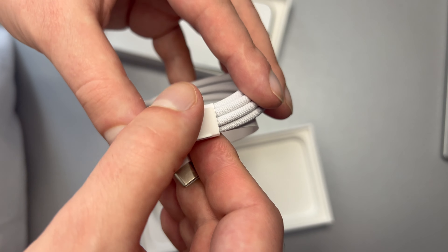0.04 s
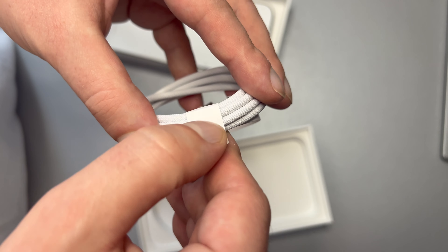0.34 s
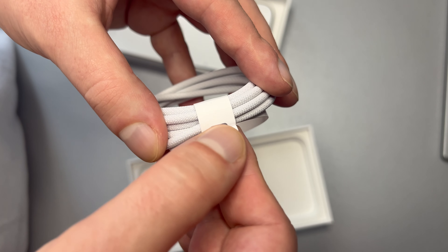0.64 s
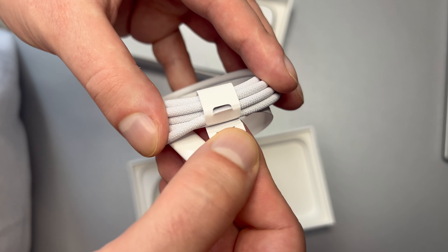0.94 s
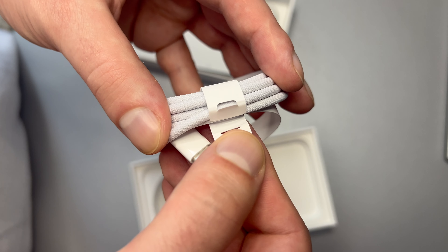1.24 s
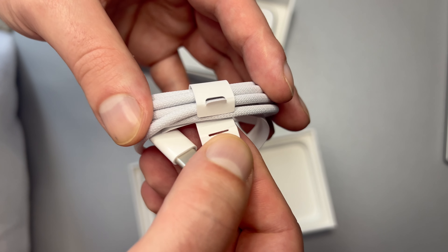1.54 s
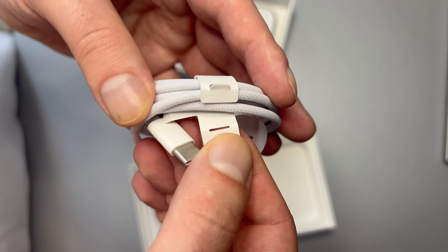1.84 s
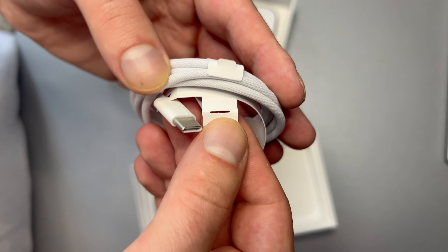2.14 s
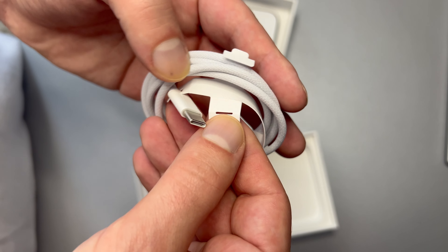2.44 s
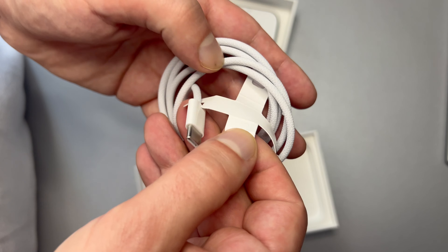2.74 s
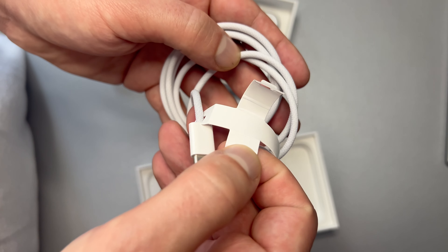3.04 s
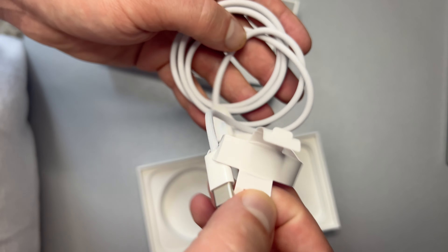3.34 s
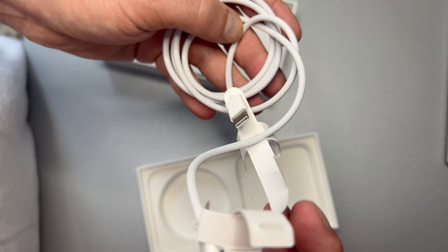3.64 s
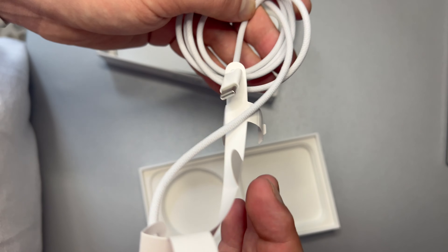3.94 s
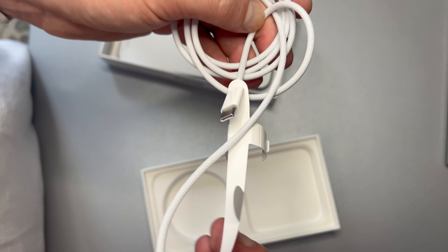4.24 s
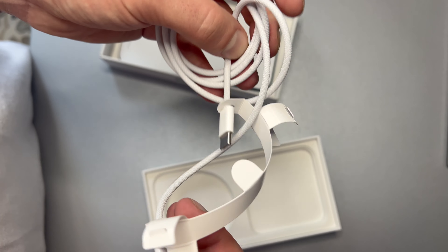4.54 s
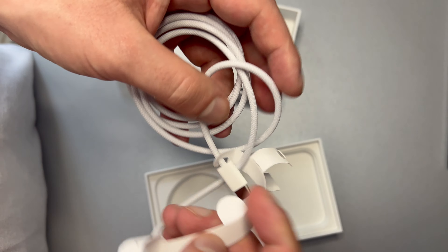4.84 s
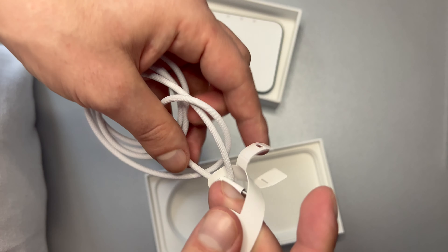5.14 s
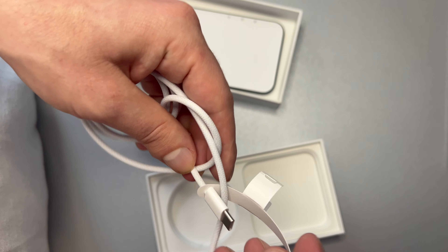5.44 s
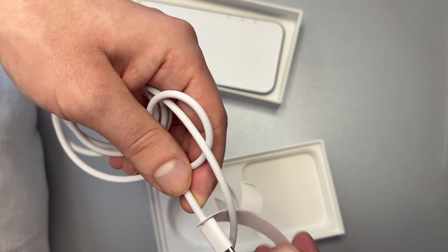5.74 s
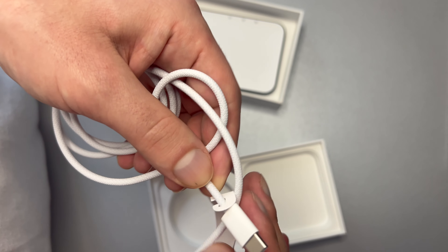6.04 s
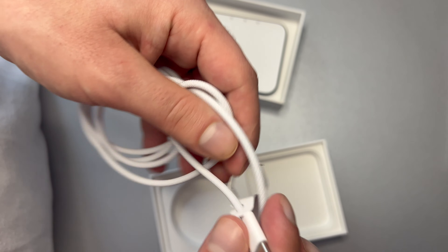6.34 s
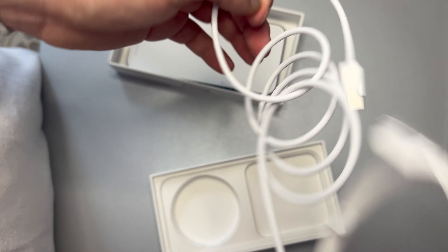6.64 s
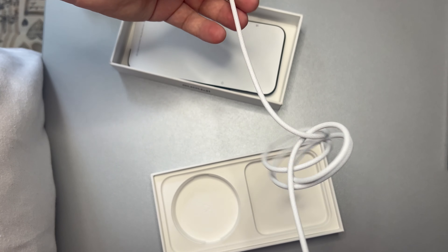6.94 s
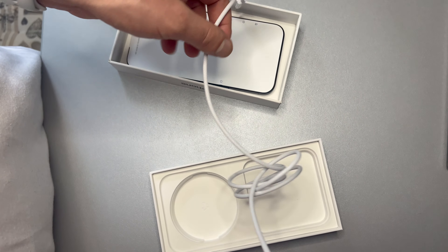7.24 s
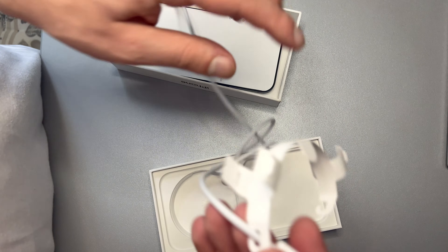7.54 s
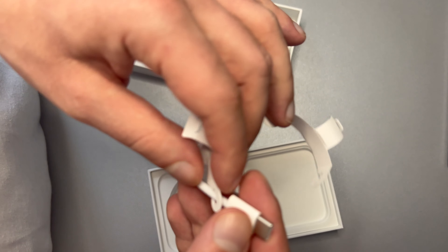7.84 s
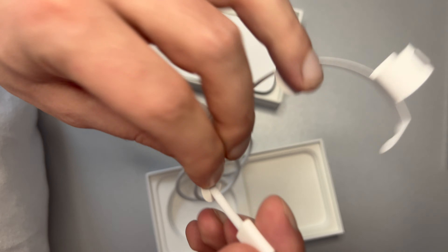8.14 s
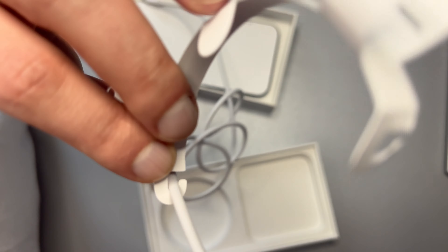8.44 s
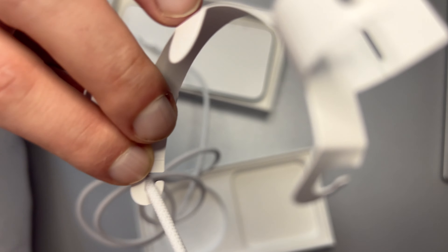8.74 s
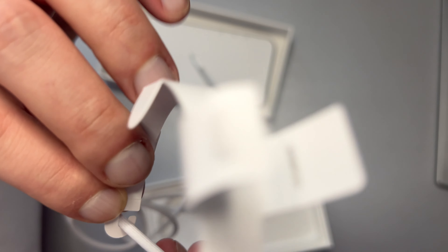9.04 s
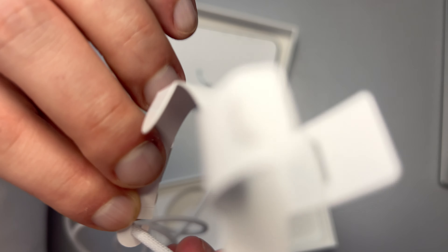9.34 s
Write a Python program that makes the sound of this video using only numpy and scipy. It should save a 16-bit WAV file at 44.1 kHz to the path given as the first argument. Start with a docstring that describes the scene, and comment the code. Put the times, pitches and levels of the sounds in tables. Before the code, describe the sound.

Paper tabs snap and fingers softly rub a braided cable, which drops rattling into a cardboard tray before the wrap scrapes along it.

```python
"""A small quiet room, close to a phone: hands peel the paper wrap off a coiled, braided cable.
Paper tabs bend and snap free, and fingers hiss on the braid as they stick and slip. The coil drops
into a cardboard tray, where its plug rattles and rings. Then the wrap slides along the cable,
catching on the weave, while the loops drag over the tray. A low hum lies underneath."""
import sys
import numpy as np
from scipy import signal
from scipy.fft import rfft, irfft, next_fast_len
from scipy.io import wavfile
from scipy.ndimage import map_coordinates

SR = 44100
rng = np.random.default_rng(int(sys.argv[2]) if len(sys.argv) > 2 else 0)


def generate_wav(sig):
    """Save sig (samples, or channels by samples) to the path in sys.argv[1] as 16-bit PCM at SR."""
    pcm = np.round(np.clip(np.atleast_2d(sig).T, -1, 1) * 32767).astype(np.int16)
    wavfile.write(sys.argv[1], SR, pcm)


N = 418509
TIME = np.arange(N) / SR
ROOM_RING_S = 0.26  # a ring time is how long a sound takes to fade by 60 dB
LEAD_S = 0.06  # time allowed for a burst to swell before its peak


def undb(db):
    """Turn decibels into a gain."""
    return 10 ** (np.asarray(db) / 20)

def unit(x):
    """Scale a sound to an average (rms) strength of 1."""
    return x / np.sqrt(np.mean(x ** 2) + 1e-30)

def response(points, size):
    """Turn a tone colour, given as (Hz, dB) points, into a gain for every frequency."""
    hz, db = np.transpose(points)
    bins_hz = np.arange(size // 2 + 1) * SR / size
    return undb(np.interp(np.log(bins_hz + 1), np.log(hz), db))

def colour(x, points):
    """Give a sound a tone colour and a strength of 1."""
    size = next_fast_len(len(x))
    return unit(irfft(rfft(x, size) * response(points, size), size)[:len(x)])

def walk(rate):
    """A random drift around zero that turns `rate` times a second."""
    knots = rng.standard_normal(N // 20)
    return 1.2 * np.interp(TIME * rate, np.arange(len(knots)), knots)

def add(track, s, sound):
    """Mix a sound in, starting at s seconds."""
    i = max(int(s * SR), 0)
    track[..., i:i + sound.shape[-1]] += sound[..., :N - i]

def ring(modes, t, contact_s=0.00051):
    """A struck thing rings in fading tones (Hz, dB, ring time), a little different at every blow."""
    chance = rng.standard_normal((len(modes), 2))
    tones = sum(undb(db + 0.99 * louder - 60 * t / ring_s)
                * np.sin(2 * np.pi * hz * (1 + 0.0018 * higher) * t)
                for (hz, db, ring_s), (higher, louder) in zip(modes, chance))
    return (1 - np.exp(-t / contact_s)) * tones

def tiny_slips(per_s):
    """Tiny slips at random moments, a few larger than the rest."""
    size = undb(np.minimum(rng.exponential(size=N), 4.5))
    return unit((rng.random(N) < per_s / SR) * size * rng.choice([-1, 1], N))

def gestures(rows, attack_s, sag_db_per_s, release_s):
    """Strength of (start, length, dB) touches: each swells, sags while it is held, then lets go."""
    power = np.zeros(N)
    for start, length, db in rows:
        t = np.arange(int((length + .4) * SR)) / SR - attack_s / 2
        shape = np.minimum(t / attack_s + .5, 1) * np.exp(-np.maximum(t - length, 0) / release_s)
        level = undb(db - sag_db_per_s * (t - length / 2))
        add(power, start - attack_s / 2, (shape * level) ** 2)
    return np.sqrt(power)

def patchy(x, hz_step, rate, depth_db, brightness=0):
    """As the contact moves, narrow resonances come and go; brightness lifts or dulls the treble."""
    hz, s, spectrum = signal.stft(x, SR, nperseg=512)
    field = rng.standard_normal((400, 1000))
    place = np.meshgrid(np.log(1 + hz / 4000) * 4000 / hz_step, s * rate, indexing="ij")
    patches_db = depth_db * 1.39 * map_coordinates(field, place, order=1, mode="mirror")
    slope = np.clip(np.log2((hz + 1) / 7800) * 0.98, -.8, .6)
    tilt_db = slope[:, None] * np.interp(s, TIME, np.broadcast_to(brightness, N))
    gain = undb(patches_db + tilt_db - np.abs(tilt_db).max(axis=0) / 3)
    return unit(signal.istft(spectrum * gain, SR, nperseg=512)[1][:N])

# How much left and right differ. Each row: frequency in Hz, relative level in dB.
SIDE_COLOUR = [(60, -33), (250, -15), (500, -8.5), (1000, -29), (3000, -4.5), (6000, -13.5), (8500, -11),
               (11000, 1.5), (13000, 12.5), (16000, 23.5)]
def microphones(x, spread_db, table_db):
    """Two close microphones hear a sound out of step; the table top scatters short waves sideways."""
    size, t = next_fast_len(len(x)), np.arange(SR // 100) / SR
    echoes = unit(np.exp(-t / 0.0016) * rng.standard_normal(len(t)))
    scatter = rfft(echoes, size) / np.sqrt(len(t))
    scatter *= response([(60, -33), (200, -10), (450, 2), (16000, -1)], size)
    gap = -1j * response(SIDE_COLOUR, size) * undb(spread_db) + undb(table_db) * scatter
    side = irfft(rfft(x, size) * gap, size)[:len(x)]
    return np.array([x + side, x - side])

def room(x, wet_db):
    """The walls add a short wash of echoes, different on each side."""
    t = np.arange(SR // 2) / SR
    shape = undb(-60 * t / ROOM_RING_S) * np.clip((t - .003) / 0.003, 0, 1)
    walls = [(100, -13.5), (250, -2), (600, 6.5), (3000, -6.5), (8000, -6), (12000, -9), (16000, -14)]
    tails = [colour(shape * rng.standard_normal(len(t)), walls) / np.sqrt(len(t)) for _ in range(2)]
    return undb(wet_db) * np.array([signal.fftconvolve(x, tail)[:N] for tail in tails])


# Tone colour of the room's air. Each row: frequency in Hz, relative level in dB.
AIR_COLOUR = [(25, -23), (36, -7), (45, 5), (65, -2.5), (85, -1), (130, -5), (200, -22), (310, -15),
              (400, -19.5), (700, -21), (1250, -26), (1900, -17.5), (2600, -25), (3200, -32), (3900, -37),
              (12000, -37.5), (14000, -49)]
# The hum. Each row: pitch in Hz, level in dB.
HUM_TONES = [(49.3, -58), (97, -72)]
def background():
    """Still room air whose two sides differ most in the low middle, and a wavering low hum alike on both sides."""
    air = undb(-69) * colour(rng.standard_normal(N), AIR_COLOUR)
    side_colour = [(40, 7.5), (300, 4.5), (900, 2.5), (2000, -14.5), (4000, -14),
                   (12000, -39.5), (16000, -15.5)]
    side = undb(-72.5) * colour(rng.standard_normal(N), side_colour)
    hum = np.zeros(N)
    for hz, db in HUM_TONES:
        level = undb(db + 1.6 * walk(6)) * np.sqrt(2)
        hum += level * np.sin(2 * np.pi * np.cumsum(hz + 1.3 * walk(8)) / SR)
    return air + hum + np.array([side, -side])

def bumps(per_s=240):
    """Many soft, dull knocks of flesh and cable, each at its own pitch."""
    out, t = np.zeros(N), np.arange(SR // 6) / SR
    for when, pitch, size in rng.random((int(per_s * N / SR), 3)):
        hz = np.interp(pitch, [0, 1], [42.2, 420.7])
        add(out, when * N / SR, ring([(hz, 4 * size, 0.09)], t, contact_s=0.0045))
    return unit(out)

# Tone colour of the hands' rumble. Each row: frequency in Hz, relative level in dB.
RUMBLE_COLOUR = [(40, -14.5), (62, 10), (95, 1), (127, 5), (165, -1), (200, -2.5), (260, -14), (330, -12.5),
                 (500, -29), (1000, -42.5)]
# The hands shift their grip. Each row: start in seconds, length in seconds, level in dB.
GRIP_SHIFTS = [(.765, 0.11, -57), (1.08, 0.059, -87), (1.33, 0.11, -58.5), (1.48, 0.15, -67),
               (1.87, 0.12, -58.5), (2.345, 0.13, -60), (2.86, 0.061, -56), (2.96, 0.03, -60.5),
               (3.38, 0.15, -66), (3.915, 0.11, -56.5), (4.38, 0.14, -54.5), (4.53, 0.14, -56),
               (5.02, 0.38, -64), (5.6, 0.25, -69), (6.19, 0.3, -55), (6.5, 0.19, -59.5),
               (6.75, 0.38, -60.5), (7.26, 0.38, -58.5), (7.77, 0.11, -52.5), (8.37, 0.27, -63.5),
               (8.95, 0.18, -63.5), (9.32, 0.049, -56.5)]
def handling(holding_db=-71.5):
    """Moving hands bump and rumble, and stay faintly audible while they just hold on."""
    force = gestures(GRIP_SHIFTS, attack_s=0.17, sag_db_per_s=13.5, release_s=0.049)
    rumble = colour(bumps() + undb(4.5) * rng.standard_normal(N), RUMBLE_COLOUR)
    return rumble * np.hypot(force, undb(holding_db))

# Tone colours of the coil settling, then sliding. Each row: frequency in Hz, relative level in dB.
SETTLING_COLOUR = [(150, -34), (250, -13.5), (342, -34), (373, -10), (436, -20), (469, -4), (725, -24.5),
                   (779, -10), (1770, -21), (2180, -1.5), (2740, -6.5), (3450, -30), (4500, -30),
                   (5850, -54), (9900, -120)]
SLIDING_COLOUR = [(200, -7.5), (320, -9), (500, -16), (750, -4), (1000, 3), (1200, 2.5), (1500, -3),
                  (2050, 0.5), (2600, -10.5), (3300, -17), (4300, -16.5), (5200, -36), (7000, -63)]
# Loops drag over the cardboard. Each row: start in seconds, length in seconds, level in dB.
LOOP_DRAGS = [(7.45, 0.22, -56), (7.69, 0.056, -64), (7.753, 0.025, -57.5), (7.812, 0.02, -54),
              (7.862, 0.033, -58.5), (8.11, 0.23, -75), (8.39, 0.061, -61.5), (8.48, 0.16, -64),
              (8.595, 0.085, -59), (8.755, 0.031, -61.5), (8.814, 0.071, -55), (8.89, 0.134, -63),
              (9.0, 0.11, -59), (9.15, 0.047, -58.5), (9.21, 0.061, -69), (9.31, 0.08, -69.5),
              (9.45, 0.028, -60.5)]
def dragging():
    """The coil settles with a bright scrape, then the tray hums hollowly as loops slide in jerks."""
    force = gestures(LOOP_DRAGS, attack_s=0.0047, sag_db_per_s=5, release_s=0.017)
    scrape = tiny_slips(per_s=1300)
    blend = np.interp(TIME, [7.95, 8.4], [0, 1])
    settling = np.sqrt(1 - blend) * colour(scrape, SETTLING_COLOUR)
    sliding = np.sqrt(blend) * colour(scrape, SLIDING_COLOUR)
    return patchy(settling + sliding, hz_step=130, rate=24, depth_db=3.4) * force * undb(0.54 * walk(38))

def friction(hiss_gain, body_gain, hiss_colour, body_colour, brightness, slips_per_s):
    """Sticking and slipping on the braid makes a high hiss over a lower body, under an unsteady grip."""
    slips = tiny_slips(slips_per_s)
    hiss = colour(slips + undb(-2) * rng.standard_normal(N), hiss_colour)
    hiss = patchy(hiss, hz_step=162.8, rate=34, depth_db=3, brightness=brightness)
    body = colour(slips + undb(2) * rng.standard_normal(N), body_colour)
    body = patchy(body, hz_step=149.5, rate=39, depth_db=3.5)
    return undb(0.77 * walk(70)) * (hiss_gain * hiss + body_gain * body)

def creaks(per_s=36, fall_s=0.002):
    """A gain that jumps at random moments, as the grip catches and lets go with a tiny tick."""
    onsets = (rng.random(N) < per_s / SR) * undb(2 + 4 * rng.uniform(-0.84, 1, N))
    return 1 + signal.lfilter([1], [1, -np.exp(-1 / (fall_s * SR))], onsets)

# Tone colours of the rubbed braid. Each row: frequency in Hz, relative level in dB.
BRAID_HISS = [(2500, -41.5), (4200, -11), (5200, -5), (6300, 4.5), (8000, 5), (10500, 4), (12000, 1.5),
              (13200, -19), (16000, -18)]
BRAID_BODY = [(150, -10), (400, -2.5), (900, -5.5), (1700, -3), (2300, 0.5), (2850, 3), (3400, -1.5),
              (4300, -2.5), (5500, -12), (8000, -39.5)]
# One long, light touch: start in seconds, length in seconds, level in dB.
LIGHT_TOUCH = (1.4, 5.51, -83)
# Strokes on the braid. Each row: start in seconds, length in seconds, hiss level in dB,
# body level in dB compared with the hiss, brightness (higher is brighter).
BRAID_STROKES = [(0, 0.11, -77.5, 1.5, -5), (0.414, 0.057, -78, -12, -1.5), (0.496, 0.16, -79, -7.5, -4.5),
                 (1.328, 0.12, -79.5, -9, 12.5), (1.559, 0.11, -78.5, -3.5, -3.5),
                 (1.71, 0.14, -79, -0.5, 1.5), (2.102, 0.071, -76.5, -4.5, 4),
                 (2.352, 0.091, -79.5, 2.5, 2), (2.448, 0.074, -65.5, 0.5, -4), (2.59, 0.056, -71.5, -4, 1),
                 (2.65, 0.16, -61, -8.5, 10), (2.835, 0.054, -57, -3.5, -3), (2.932, 0.089, -73.5, 0.5, -6),
                 (3.206, 0.076, -59.5, -8.5, -4.5), (3.313, 0.15, -72, -4, 0.5),
                 (3.474, 0.14, -78, -3, -2.5), (3.999, .16, -74, -4, 0), (4.339, 0.33, -72.5, -5.5, -1),
                 (4.708, 0.07, -65, -10, 6.5), (4.85, 0.05, -67, -10, -1), (4.942, 0.19, -64.5, -5, 1.5),
                 (5.16, 0.31, -73.5, -4.5, -7), (5.384, 0.069, -58, -7, -11), (5.48, 0.035, -72, -5, -8),
                 (5.558, 0.055, -63.5, -8.5, -10), (5.636, 0.053, -72, -4, -4.5),
                 (5.714, 0.12, -69, -4, -6), (5.93, 0.21, -65.5, -9.5, -9), (6.18, 0.09, -69, -12, -7.5),
                 (6.315, 0.094, -60.5, -8.5, -11.5), (6.436, 0.12, -65.5, -15.5, -1.5),
                 (6.522, 0.16, -56.5, -5.5, -13.5), (6.672, 0.099, -64.5, -9.5, -2.5),
                 (6.788, 0.14, -78.5, -6, 2), (7.265, 0.075, -76, 17.5, -6.5),
                 (7.374, 0.18, -64.5, 5.5, -21), (7.542, 0.17, -60.5, 5, -10), (7.737, 0.16, -69, 4.5, 0.5),
                 (8.084, 0.19, -62, -4, 2.5), (9.296, 0.058, -70.5, -7, -6.5),
                 (9.406, 0.047, -63, -11.5, -6.5)]
def rubbing():
    """Fingers and paper stroke the braid, and keep a light touch on it while the coil is turned."""
    start, length, hiss_db, body_db, brightness = np.transpose(BRAID_STROKES)
    hiss, body = (gestures(zip(start, length, db), attack_s=0.022, sag_db_per_s=7.5, release_s=0.022)
                  for db in (hiss_db, hiss_db + body_db))
    touch = gestures([LIGHT_TOUCH], attack_s=0.38, sag_db_per_s=-2, release_s=0.13)
    hiss, body = np.hypot(hiss, touch), np.hypot(body, touch * undb(-4))
    brightness = np.interp(TIME, start + length / 2, brightness)
    return creaks() * friction(hiss, body, BRAID_HISS, BRAID_BODY, brightness, slips_per_s=1400)

# The weave rasps. Each row: start in seconds, length in seconds, level in dB, pitch in Hz, width in Hz.
WEAVE_RASPS = [(0.403, 0.078, -73.5, 7150, 900), (0.502, 0.076, -77, 7070, 800),
               (3.204, 0.082, -64, 7000, 900), (3.336, 0.012, -58.5, 1780, 500),
               (3.363, 0.0166, -66, 1600, 400), (3.423, 0.017, -61.5, 1568, 450),
               (3.337, 0.083, -68, 6740, 900), (3.997, 0.16, -74.5, 6100, 900),
               (4.35, 0.28, -73, 6150, 897), (5.928, 0.17, -76, 6460, 700),
               (6.377, 0.023, -50.5, 6100, 1200), (8.085, 0.18, -63, 8240, 800),
               (7.752, 0.028, -59, 2170, 350), (7.808, 0.028, -59, 2350, 400),
               (7.852, 0.048, -59.5, 2220, 350), (8.406, 0.058, -59.5, 2347, 300),
               (8.812, 0.045, -54.5, 1998, 645)]
def rasps(attack_s=0.016, release_s=0.0051, wanders_per_s=30):
    """The weave runs evenly over a finger, the wrap or the tray, giving a hoarse, wandering note."""
    out = np.zeros(N)
    for start, length, db, hz, width_hz in WEAVE_RASPS:
        t = np.arange(int((length + .1) * SR)) / SR
        swell = np.minimum(t / min(attack_s, length / 2), 1)
        fade = np.exp(-np.maximum(t - length, 0) / release_s)
        low_pass = signal.butter(2, width_hz / 2, fs=SR, output="sos")
        slips = unit(signal.sosfilt(low_pass, rng.standard_normal((2, len(t)))))
        wander = np.interp(t * wanders_per_s, np.arange(40), rng.standard_normal(40))
        phase = 2 * np.pi * np.cumsum(hz * (1 + 0.019 * wander)) / SR
        band = slips[0] * np.cos(phase) + slips[1] * np.sin(phase)  # noise moved up to the pitch
        add(out, start, undb(db) * swell * fade * band)
    return out * undb(2.5 * walk(55))

# Tone colours of the sliding wrap. Each row: frequency in Hz, relative level in dB.
WRAP_HISS = [(2500, -40), (4800, -11), (5600, 2), (6400, 1.5), (7200, 2), (8600, 7.5), (9700, 2.5),
             (11300, -3.5), (12600, -6), (13400, -18.5), (16000, -20)]
WRAP_BODY = [(200, -16.5), (600, -11), (1100, -5), (1900, -6), (2350, 2.5), (2800, -5), (3400, -8.5),
             (4200, -6.5), (4900, -15), (8000, -37.5)]
# Two pulls on the wrap, one list for each. Each row: time in seconds, strength in dB.
WRAP_PULLS = [
    [(8.34, -90), (8.358, -67), (8.42, -49.5), (8.638, -57.5), (8.756, -77), (8.764, -65.5), (8.83, -79.5),
     (8.87, -67)],
    [(8.87, -68.5), (8.892, -75), (8.9, -63), (8.956, -58), (8.964, -70.5), (9.018, -55), (9.088, -55),
     (9.2, -91.5)],
]
# For each pull, the body level in dB compared with the hiss.
WRAP_BODY_DB = (-3, -2)
def pulling(catch_fall_s=0.002):
    """The sliding wrap catches on the weave; a harder pull gives quicker catches that merge into hiss."""
    pulls_db = [np.interp(TIME, *np.transpose(pull), left=-120, right=-120) for pull in WRAP_PULLS]
    pull_db = np.max(pulls_db, axis=0)
    body_db = np.take(WRAP_BODY_DB, np.argmax(pulls_db, axis=0))
    catches_per_s = 100 * 2 ** np.maximum((pull_db + 55.5) / 12, -1)  # doubles every 12 dB
    phase = np.cumsum(catches_per_s * np.exp(0.18 * walk(90))) / SR % 1
    pulses = unit(np.exp(-phase / catches_per_s / catch_fall_s) * undb(1.5 * walk(80)))
    catches = catching(pulses, pull_db)
    force = undb(pull_db - 1)
    hiss, body = force * catches, force * np.sqrt(catches) * undb(body_db)
    return friction(hiss, body, WRAP_HISS, WRAP_BODY, brightness=-2, slips_per_s=4000)

# How jerky a pull is. Each row: strength in dB, share of the friction that comes in catches (0 to 1).
JERKINESS = [(-58, .62), (-50, .35)]
def catching(pulses, pull_db):
    """A gain that blends steady sliding with catches: gentle pulls are the jerkiest."""
    share = np.interp(pull_db, *np.transpose(JERKINESS))
    return np.sqrt(1 - share + share * pulses ** 2)

# Tone colours of a burst's middle, its low end and its echo.
# Each row: frequency in Hz, relative level in dB.
MIDDLE_COLOUR = [(1000, -23), (1850, 2), (2700, 6), (3350, 0.5), (4000, -2.5), (4900, -10), (7000, -27),
                 (16000, -49)]
LOW_COLOUR = [(120, -8), (350, 7), (700, 2), (1150, 9), (1700, 4), (2800, -34.5), (8000, -64.5)]
ECHO_COLOUR = [(300, 10), (1500, 1), (3200, 4.5), (4400, 5.5), (5500, 4), (7000, -3), (12000, -6.5),
               (16000, -4.5)]
def burst(rise_s, fall_s, levels_db, treble, echo_db, skirt_db, click_share):
    """One clean click amid smaller slips, in treble, middle and low bands; returns sound and echo."""
    size = 12288
    t = np.arange(size) / SR - LEAD_S
    peak = np.exp(np.minimum(t / max(rise_s, 1e-4), -t / max(fall_s, 1e-4)))
    skirt = undb(skirt_db) * np.exp(-np.abs(t) / 0.0054)  # faint slips on both sides of the peak
    shape = np.maximum(peak, skirt)
    click = np.linalg.norm(shape) * signal.unit_impulse(size, int(LEAD_S * SR))
    noise = shape * rng.standard_normal((3, size))
    slips = rfft(np.sqrt(click_share) * click + np.sqrt(1 - click_share) * noise)
    bands = (treble, MIDDLE_COLOUR, LOW_COLOUR)
    gains = [undb(db) * unit(response(band, size)) for db, band in zip(levels_db, bands)]
    direct = sum(undb(db) * unit(irfft(slip * gain)) for db, slip, gain in zip(levels_db, slips, gains))
    echo_shape = undb(-60 * t / ROOM_RING_S) * np.clip(t / 0.0081, 0, 1)
    wash = unit(echo_shape * rng.standard_normal((2, size)))
    echo = irfft(rfft(wash) * np.linalg.norm(gains, axis=0) * response(ECHO_COLOUR, size))
    strength = np.sqrt(np.mean(shape ** 2))
    return direct * strength, echo * strength * undb(echo_db)

# Tone colour of a knock's treble. Each row: frequency in Hz, relative level in dB.
KNOCK_TREBLE = [(3000, -38.5), (4500, 5), (6500, 5), (8500, -1), (11000, -11), (13000, -15), (16000, -34)]
# How the plug, the tray's panels and the tray ring. The first table holds the plug's short ring together with
# the longer tones of the tray's hollow panels; the second holds the tray's thud. Each row: pitch in Hz,
# relative level in dB, ring time in seconds.
PLUG_AND_PANEL_TONES = [(1083, -29, 0.071), (1235, -26.5, 0.066), (1890, -42, 0.019), (2820, -16, 0.06),
                        (2948, -6, 0.023), (3022, -4, 0.027), (3220, -9.5, 0.031), (3344, -15, 0.056),
                        (2630, -32, .3), (2850, -30, .32), (3400, -34, 0.197), (3730, -30, .12), (4080, -33, 0.19),
                        (5760, -17.5, 0.012), (6700, -22, 0.01)]
TRAY_TONES = [(125, 1.5, 0.26), (161, -13, 0.4), (204.6, -4, 0.2), (224, -2.5, 0.27), (333, -4.5, 0.079),
              (412, -7, 0.1), (469, -13.5, 0.2), (595, -14, 0.09), (764, -13, 0.11)]
# The plug taps the cable, and both strike the tray. Each row: time in seconds, fall in seconds, # then levels
# in dB for the treble, the middle, the low end, the ring of plug and panels, and the tray's thud.
PLUG_KNOCKS = [(4.89, 0.0021, -48, -54.5, -88, -45, -75), (7.241, 0.0018, -70, -60, -67, -49.5, -71.5),
               (7.25, 0.0062, -41, -25.5, -39, -23, -66), (7.3724, 0.003, -32.5, -30, -39.5, -30.5, -54),
               (7.385, .002, -62.5, -48, -51, -39, -41.5), (7.393, 0.0028, -40.5, -49, -51, -14, -53.5),
               (7.405, 0.0029, -34.5, -28, -28, -32, -39.5), (7.409, 0.003, -57.5, -51, -40, -36, -30.5),
               (7.4362, 0.0024, -46, -43, -34.5, -16, -54), (7.451, 0.0055, -51, -44, -46, -42, -54.5),
               (7.462, 0.0034, -60, -37, -26, -62, -60), (7.5697, 0.0023, -66, -58, -52, -40, -56),
               (7.67, 0.0036, -42.5, -64, -43, -35.5, -53.5), (8.2909, 0.0028, -72, -53, -77, -45, -61.5),
               (8.546, 0.0013, -66, -43.5, -47, -56, -68)]
def knocks():
    """Each blow is a crack, a short bright ring of the plug with the tray's panels ringing on, and a thud of
    the tray."""
    cracks, rings, t = np.zeros((2, N)), np.zeros(N), np.arange(SR // 3) / SR
    for s, fall_s, *levels_db, plug_db, tray_db in PLUG_KNOCKS:
        direct, echo = burst(0.0001, fall_s, levels_db, KNOCK_TREBLE,
                             echo_db=-13, skirt_db=-21, click_share=0.35)
        add(cracks, s - LEAD_S, microphones(direct, spread_db=-2.5, table_db=-7) + echo)
        add(rings, s, undb(plug_db) * ring(PLUG_AND_PANEL_TONES, t))
        add(rings, s, undb(tray_db) * ring(TRAY_TONES, t, contact_s=0.0018))
    return cracks + microphones(rings, spread_db=1.5, table_db=-13) + room(rings, wet_db=-14.5)

def ping():
    """A brief metallic ping as the coil slips out of the hand."""
    out = np.zeros(N)
    add(out, 6.548, ring([(6240, -24.5, 0.016)], np.arange(SR // 10) / SR))
    return out

# Tone colour of the paper's treble. Each row: frequency in Hz, relative level in dB.
PAPER_TREBLE = [(3000, -33), (4000, -5.5), (4800, -8), (6000, 0.5), (7600, 5), (10000, 2.5), (12000, 1),
                (13500, -19.5), (16000, -17)]
# Scuffs. Each row: peak time in seconds, swell in seconds, then treble, middle and low levels in dB.
PAPER_SCUFFS = [(1.344, 0.0042, -73, -83, -83), (2.054, 0.0027, -69, -62, -55.5),
                (2.118, 0.0039, -84, -81, -72), (2.663, 0.01, -51, -75, -68), (2.715, 0.021, -64, -81, -61),
                (2.882, 0.0099, -52, -54, -52.5), (2.987, 0.006, -45.5, -53.5, -61),
                (3.209, 0.014, -57, -71, -65), (3.275, 0.0063, -45.5, -57.5, -56),
                (3.348, 0.0072, -55, -75, -70), (3.374, 0.0045, -57, -69, -74),
                (3.435, 0.0077, -49.5, -58.5, -62.5), (4.38, 0.0062, -55.5, -69.5, -72),
                (4.61, 0.01, -57, -63.5, -68.5), (4.955, 0.0032, -63, -59, -62),
                (5.152, 0.0048, -50, -78, -83), (5.2748, 0.0023, -66, -58.5, -72),
                (5.555, 0.01, -57.5, -81, -88), (5.732, 0.008, -55, -56.5, -82),
                (5.799, 0.0044, -43, -52, -56.5), (6.091, 0.0055, -48, -54.5, -63.5),
                (6.302, 0.003, -53.5, -62.5, -80), (6.39, 0.0061, -48.5, -57, -79),
                (6.589, .002, -43, -44, -45), (6.625, 0.0012, -48, -39.5, -42),
                (7.725, 0.024, -58.5, -73, -71), (7.958, 0.011, -57, -58, -66),
                (9.34, 0.0033, -53.5, -76, -63.5)]
# Ticks. Each row: time in seconds, treble level in dB, middle level in dB.
EDGE_TICKS = [(0.53, -60, -79), (0.622, -49, -71), (0.632, -59, -80), (0.644, -54, -78), (0.651, -57, -81),
              (0.7123, -57.5, -70), (0.836, -41, -50), (1.2594, -61.5, -89), (1.418, -58.5, -75),
              (1.9579, -56.5, -61), (2.0426, -53, -54.5), (2.472, -50, -48.5), (2.9633, -58, -72),
              (3.1447, -46.5, -68), (3.8857, -49, -75), (4.296, -56, -59.5), (4.724, -51.5, -63),
              (6.1569, -50, -57), (6.1874, -54, -62), (6.328, -46.5, -55), (8.419, -43, -55),
              (8.641, -48, -56), (8.767, -55, -78), (8.902, -58, -66), (8.9087, -55, -64),
              (8.922, -49, -57), (8.9518, -44.5, -62), (8.9721, -50, -64), (9.008, -47, -57),
              (9.0253, -45, -50), (9.058, -45, -60), (9.065, -47, -62), (9.101, -47, -62),
              (9.388, -45, -63), (9.453, -41, -53)]
# Snaps. Each row: time, rise and fall in seconds, then treble, middle and low levels in dB,
# stereo width in dB, share of clean click (0 to 1), treble tilt in dB per octave.
TAB_SNAPS = [(0.844, .0001, 0.00019, -10.5, -38, -35.5, 3, 1, 1.5),
             (0.8443, 0.0021, 0.0023, -25.5, -46.5, -43.5, -0.5, 0, 0),
             (0.8486, 0.00023, 0.00059, -26, -40, -52, -3.5, 0.44, 1.5),
             (2.847, 0.0003, 0.0022, -28.5, -28, -43, 2, 0.25, -8),
             (2.8914, 0.0012, .0012, -36.5, -49, -48, -1, 0.02, 0),
             (5.786, 0.0087, .003, -33.5, -41, -52, 1, 0, -10.5),
             (6.548, 0.0036, 0.0028, -41.5, -43, -55, -5, 0, -7.5),
             (6.58, .0012, .0018, -35.5, -49.5, -52, -4, 0.1, 1),
             (6.617, 0.005, 0.0022, -30.5, -37, -48, 1, 0.02, 2.5),
             (6.628, 0.00085, 0.0025, -29, -36.5, -41.5, -10, 0.37, -9.5),
             (6.6466, 0.0015, 0.0032, -21, -38, -46.5, -1, 0.34, 0.5)]
def paper():
    """Tabs bend and snap free, and paper edges tick and scuff past the cable."""
    out = np.zeros((2, N))

    def play(s, rise_s, fall_s, levels_db, width_db=1, click_share=0, tilt_db=0):
        treble = [(hz, db + tilt_db * np.log2(hz / PAPER_TREBLE[0][0])) for hz, db in PAPER_TREBLE]
        direct, echo = burst(rise_s, fall_s, levels_db, treble,
                             echo_db=-16.5, skirt_db=-22, click_share=click_share)
        add(out, s - LEAD_S, microphones(direct, spread_db=width_db, table_db=-11) + echo)

    for s, rise_s, fall_s, *levels_db, width_db, click_share, tilt_db in TAB_SNAPS:
        play(s, rise_s, fall_s, levels_db, width_db, click_share, tilt_db)
    for s, treble_db, middle_db in EDGE_TICKS:
        levels_db = (treble_db, middle_db, middle_db - 3)
        play(s, rise_s=0.0004, fall_s=0.0011, levels_db=levels_db, click_share=0.15)
    for s, swell_s, *levels_db in PAPER_SCUFFS:
        play(s, swell_s, swell_s, levels_db, tilt_db=-4)  # duller than a tick
    return out

def scene():
    """The hands are near the phone; the tray lies further off, so the room answers it more."""
    rub = rubbing() + rasps() + pulling() + handling()
    drag = dragging()
    near = paper() + ping() + microphones(rub, spread_db=2.5, table_db=-10) + room(rub, wet_db=-13)
    far = knocks() + microphones(drag, spread_db=0.5, table_db=-26) + room(drag, wet_db=-9.5)
    return near + far + background()

def record(dry):
    """The phone cuts the deepest bass and the highest treble."""
    low_cut = signal.butter(5, 36, "high", fs=SR, output="sos")
    high_cut = signal.ellip(8, .2, 70, 16300, fs=SR, output="sos")
    return signal.sosfilt(np.vstack([low_cut, high_cut]), dry)


dry = scene()
out = record(dry)
generate_wav(out)
```